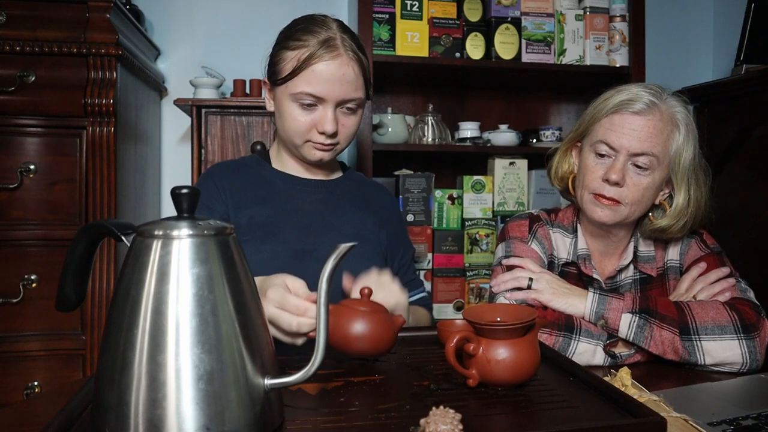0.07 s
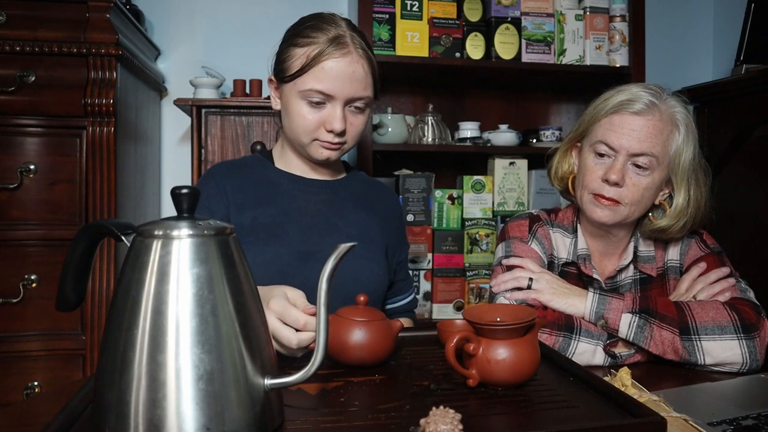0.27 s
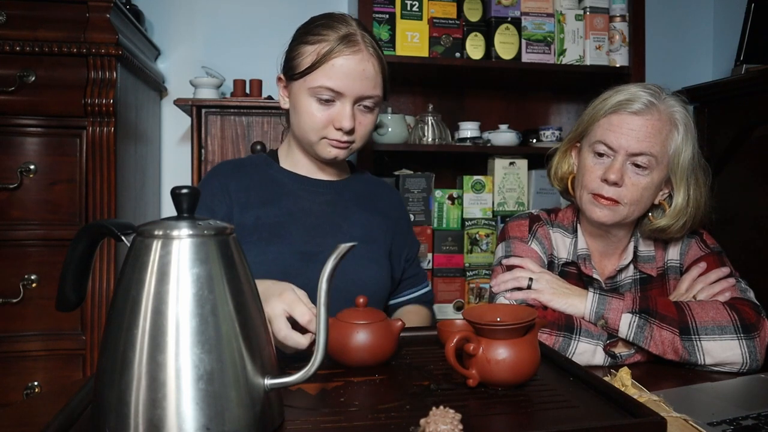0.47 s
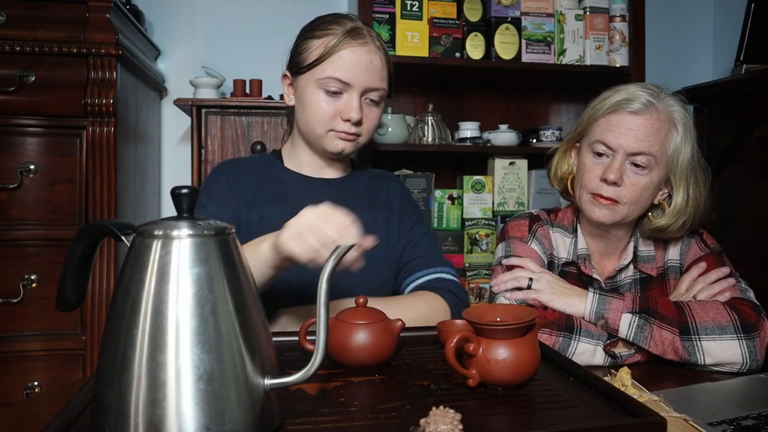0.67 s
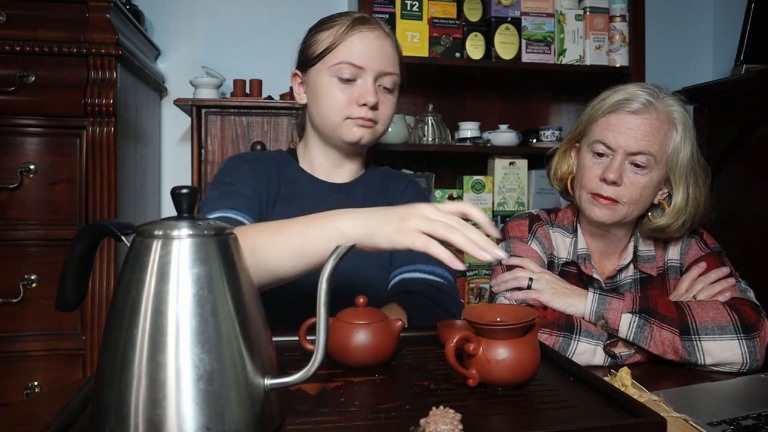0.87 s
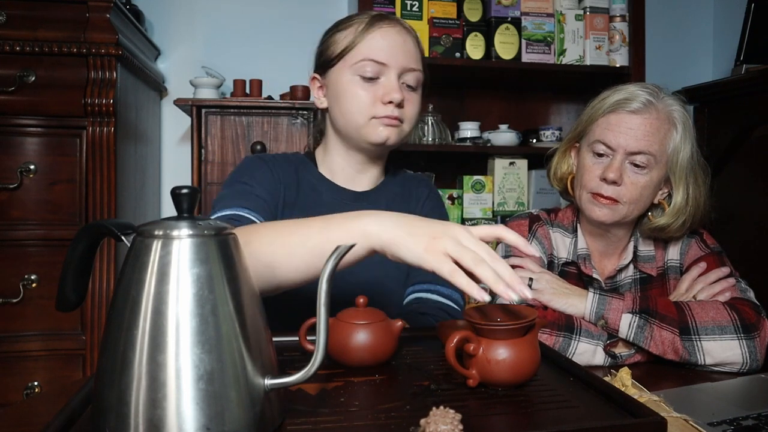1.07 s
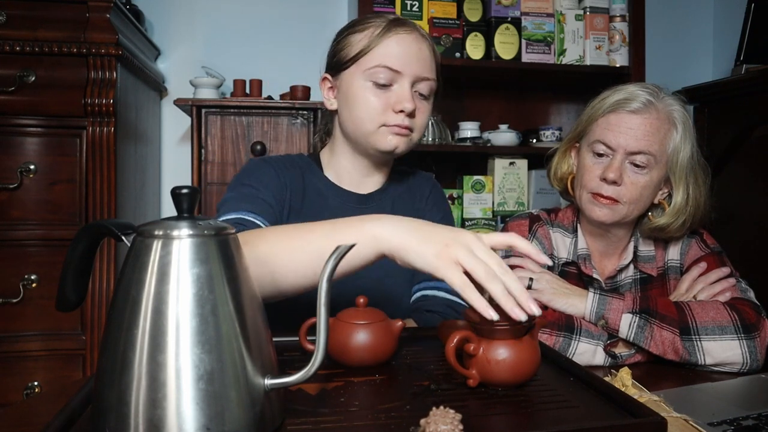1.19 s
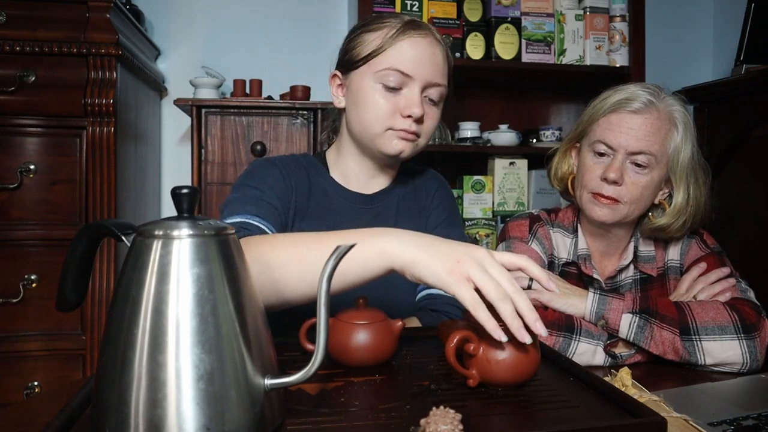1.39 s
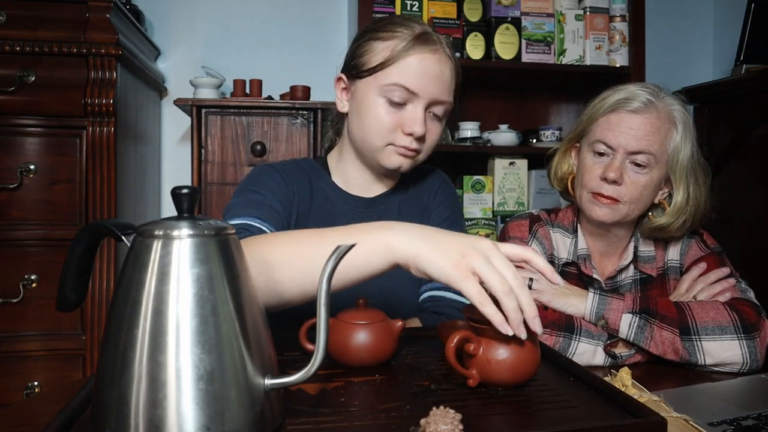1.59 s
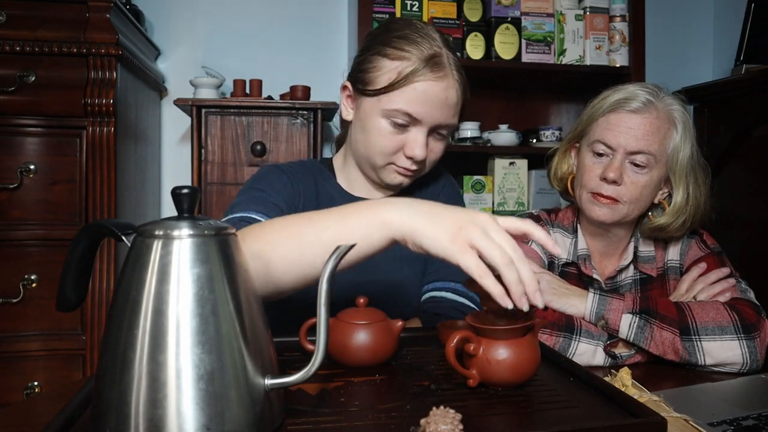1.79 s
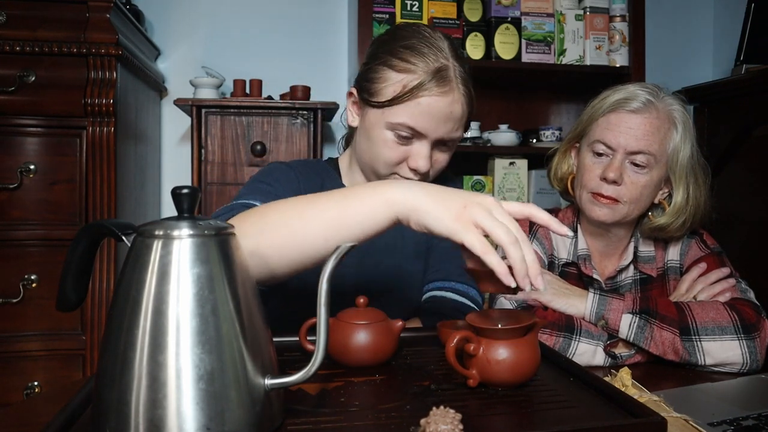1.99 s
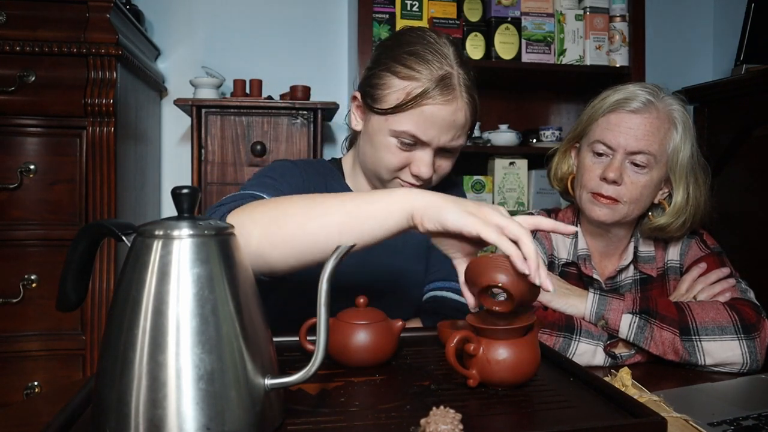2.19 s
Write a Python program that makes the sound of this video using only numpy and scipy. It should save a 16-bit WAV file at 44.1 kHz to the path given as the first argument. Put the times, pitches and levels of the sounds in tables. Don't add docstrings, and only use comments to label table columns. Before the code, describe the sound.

A small clay teapot hits a wooden tray at 0.2 s, very loud and sharp, its lid rattling brightly. It drags briefly and knocks again, less loudly, around 0.46 s. Near-quiet follows, with faint room tone. Sleeves rustle and the table thuds softly around 1.1-1.35 s. A clay strainer ticks onto a jug from 1.4 s, rubs faintly, clicks at 1.58 and 1.9 s, and settles with soft grinds. Close microphone, short room reverberation.

```python
import sys
import numpy as np
from scipy import signal
from scipy.fft import rfft, irfft, next_fast_len
from scipy.io import wavfile
from scipy.ndimage import map_coordinates

SR = 44100
rng = np.random.default_rng(int(sys.argv[2]) if len(sys.argv) > 2 else 0)


def inscribe(sig):
    pcm = np.round(np.clip(np.atleast_2d(sig).T, -1, 1) * 32767)
    wavfile.write(sys.argv[1], SR, pcm.astype(np.int16))


def boost_factor(decibels):
    exponent = np.asarray(decibels, float) / 20
    return 10 ** exponent


N = 99225
SPAN = 15876

# freq_hz, level_db
AIR_COLOUR = [(20, -14.5), (60, -10.5), (250, -10.5), (450, -14.5), (800, -27), (2500, -32), (8000, -42.5),
              (16000, -52)]
AIR_DB = -61.5
# freq_hz, t60_s
ROOM_T60 = [(100, 0.16), (600, .4), (3000, 0.27), (6000, 0.18), (12000, 0.083)]
# freq_hz, level_db
ROOM_COLOUR = [(100, -12), (1000, -0.5), (4500, 1), (12000, 3)]
WET_DB, RING_WET_DB, ROOM_GAP_S = -13.5, -20, .005
# freq_hz, level_db
MIC_TOP = [(14800, 0), (15500, -7), (15900, -22), (16500, -26)]

# time_s, level_db
SWAY = [(0, -66), (.19, -97), (.22, -41), (.45, -50), (.8, -59), (1.04, -69), (1.1, -53.5), (1.24, -35.5),
        (1.34, -49), (1.5, -42.5), (1.66, -57), (1.8, -54.5), (1.9, -67), (2.25, -74)]
SWAY_HZ, SWAY_WIDTH_HZ = 18.5, 7
# start_s, level_db, pitch_hz, t60_s
THUMPS = [(0.202, -31, 105, 0.15), (0.222, -22, 255.5, 0.17), (.205, -19, 427.8, .11),
          (0.301, -48, 84, 0.95), (.455, -36, 83.3, 0.35), (.58, -45, 83.4, 0.51), (1.066, -37, 61.7, 0.21),
          (1.088, -41.5, 110, 0.147), (1.112, -41.5, 309, 0.049), (1.19, -45.5, 116.8, 0.18),
          (1.2, -43, 252.5, 0.14), (.47, -28.5, 159.4, 0.1), (1.64, -50, 237.6, 0.31),
          (1.659, -52.5, 88.2, 0.39)]
# start_s, level_db, pitch_hz, t60_s
PINGS = [(0.2, -36.5, 5400, 0.49), (0.48, -54, 4274, 0.54), (1.6, -61.5, 4900, 0.17),
         (1.3, -35, 390, 0.079), (2.075, -56, 550, .08), (1.584, -47, 4320, 0.037), (1.908, -46, 975, 0.07),
         (1.621, -47, 2930, 0.094), (1.49, -68, 1700, 0.16), (1.696, -54, 4060, 0.12),
         (1.782, -54, 3000, 0.16)]
# time_s, rustle_db
SLEEVE = [(0, -69), (.15, -59.5), (.6, -67), (.69, -61.5), (.8, -77), (1.0, -63.5), (1.2, -51.5),
          (1.33, -55.5), (1.42, -70.5), (1.7, -67), (2.05, -71), (2.25, -66.5)]
# freq_hz, level_db
CLOTH = [(300, 4), (1200, -4), (2300, 0), (3300, -8.5), (4900, -6), (6200, -14), (15500, -26.5)]
GRIT_DB, FLUTTER_DB = 1.1, .9

# start_s, length_s, level_db, resonance_hz, top_hz
DRAGS = [
    (.35, 0.12, -41, 3100, 5900),
    (.40, 0.076, -39.5, 5190, 6900),
]
# start_s, length_s, level_db, resonance_hz, top_hz
SETTLING = [
    (1.08, 0.7, -50.5, 255, 674),
    (1.58, 0.46, -51, 307, 865),
    (1.485, 0.045, -81, 1900, 4970),
    (1.59, 0.25, -50.5, 830, 5640),
    (1.782, 0.117, -53, 2600, 8970),
    (1.9, 0.16, -45.5, 3330, 12100),
    (1.955, 0.085, -48.5, 1200, 5850),
]
SWELL_DB, FADE_DB = 14, 27.5
SLIDE_WIDTH_HZ, SLIDE_RISE, SLIDE_GRIT_DB, SLIDE_BROAD = 550, .15, 1.2, .28

# time_s, level_db
RUB = [(1.39, -95), (1.397, -69.5), (1.43, -74), (1.45, -84), (1.49, -82), (1.56, -91), (1.58, -68),
       (1.6, -87), (1.618, -65), (1.632, -48), (1.645, -72), (1.67, -78), (1.712, -76), (1.725, -92.5),
       (1.8, -120)]
# pitch_hz, width_hz, level_db
SINGING = [(4250, 120, -12), (8150, 600, -12), (8900, 260, 0), (9400, 240, -8), (14500, 200, -15)]
RUB_BODY_DB, RUB_GROWS, RUB_GRIT_DB = -3, 0.67, 3

# start_s, strength_db, rim_ring_db, colour_hz, contact_s
TOUCHES = [
    (1.453, -38, -52, 4470, 0.01),
    (1.461, -30, -56, 2217, 0.004),
    (1.466, -32, -49, 2980, 0.00597),
    (1.472, -32, -60, 1900, 0.0061),
    (1.479, -43.5, -60, 2000, .008),
]
# start_s, strength_db, rim_ring_db, colour_hz, contact_s
JUG_HITS = [(1.407, -57.5, -72, 4275, .006), (1.5835, -32.5, -63, 1900, 0.002),
            (1.619, -43.5, -70, 2780, .022), (1.586, -32, -61, 2600, 0.0014),
            (1.669, -47.5, -59, 2500, 0.007), (1.678, -50, -74, 5010, 0.0056),
            (1.688, -39, -60, 2186, 0.011), (1.703, -42.5, -68, 7000, 0.0064),
            (1.779, -39, -70, 900, 0.00404), (1.782, -40, -66, 11980, 0.004),
            (1.799, -48, -75.5, 2190, 0.0075), (1.816, -46, -78, 2448, 0.018),
            (1.8955, -30.5, -68, 4560, 0.0052), (1.8990, -25, -46, 8950, 0.00075),
            (1.949, -37.5, -68.5, 1802, 0.00975), (2.075, -55, -81, 500, 0.0082)]
# pitch_hz, width_hz, level_db
STRAINER = [(913, 62, -10), (1200, 110, -8), (1715, 96, -4), (1988, 99, 0.5), (2150, 90, -7.5),
            (2960, 80, -8.5), (4410, 80, -11), (4900, 150, -12.5)]
# pitch_hz, width_hz, level_db
JUG = [(525, 35, 6), (884, 33, 1.5), (1188, 48, 0), (1840, 84, -3), (1955, 48, -1.5), (2600, 70, -2),
       (2930, 69, 2.5), (4088, 115, 5), (4840, 38, -8.5)]
# pitch_hz, level_db, t60_s
RIM = [(8750, -3, .03), (8950, 0, .04), (9650, -6, .03), (14550, -12, .05)]
# freq_hz, level_db
JUG_COLOUR = [(300, -30), (600, 2), (4000, -6), (6500, -13.5), (16000, -25)]
# freq_hz, t60_s
JUG_T60 = [(500, 0.1), (3000, 0.04), (14000, 0.017)]
JUG_MODES_DB, STRAINER_MODES_DB = -1.5, 13

# start_s, strength_db, lid_ring_db, colour_hz, contact_s
POT_HITS = [(.2024, 3, -30, 2000, 0.0011), (.2076, 1, -13.5, 2564, 0.00062), (.2115, -8, -7, 4540, 0.0028),
            (.2150, -8.5, -14, 820, 0.0046), (.2180, -8, -16, 2500, .004), (.2220, -6.5, -12, 1900, 0.0019),
            (.2250, -11.5, -11, 600, 0.0048), (.2280, -10.5, -8.5, 5500, 0.007),
            (.2330, -15, -14, 4500, .002), (.2385, -23, -31, 2006, .003), (.6600, -58, -76.5, 5060, 0.029),
            (1.1720, -39, -72, 330, 0.0018), (1.1770, -37.5, -81, 2990, 0.00401),
            (1.3590, -45.5, -80, 1500, 0.0079)]
# start_s, strength_db, lid_ring_db, colour_hz, contact_s
KNOCKS = [
    (.4525, -20.5, -63, 600, 0.003),
    (.4558, -12.5, -35, 3500, .003),
    (.4595, -12, -50, 1000, 0.003),
    (.4660, -14, -37.5, 846, .004),
    (.4650, -26.5, -48, 4000, .007),
]
# pitch_hz, width_hz, level_db
TRAY = [(427, 24, 7), (755, 76, 8.5), (1070, 140, 7), (1400, 150, 9), (1570, 60, -5), (2077, 250, 2.5),
        (3100, 150, -4), (5180, 360, -4.5), (5820, 100, -6)]
# pitch_hz, width_hz, level_db
POT_BODY = [(523, 47, 2.5), (753, 49, -3), (850, 83, 0), (1406, 110, -3), (2370, 150, -18),
            (2770, 89, -3.5), (3200, 110, -15.5), (5195, 120, -17)]
# pitch_hz, level_db, t60_s
LOOSE_LID = [(4775, -20, .11), (5820, -15, .09), (6756, -19, .06), (8650, -4, .03), (8860, 0, .04),
             (9100, -20, .3), (9350, -23, .3), (9950, -24, .14), (10750, -18, .05), (12000, -25, .04),
             (13290, -28, .08), (14340, -21, .17), (14500, -12, .03)]
# pitch_hz, level_db, t60_s
SEATED_LID = [(8900, 0, .047), (9080, -14, .2), (9980, -20, .2), (10750, -16, .04), (14400, -14, .12)]
# freq_hz, level_db
TRAY_COLOUR = [(60, -7), (200, -15.5), (600, -4.5), (3000, -2), (6000, -1), (12000, -21), (16000, -33.5)]
# freq_hz, t60_s
TRAY_T60 = [(150, 0.39), (1000, 0.045), (5000, 0.011), (14000, 0.0084)]
TRAY_MODES_DB, KNOCK_MODES_DB = -12, -10

GRIT_S = .002
BLUR_HZ = 55.6
MODE_SCATTER_DB = -3
COLOUR_WIDTH, COLOUR_STEEP = 1.5, 1.15


def unit(x):
    return x / np.sqrt(np.mean(x ** 2) + 1e-20)


def along(points, hz):
    f, v = np.transpose(points)
    return np.interp(np.log(hz + 1), np.log(f + 1), v)


def curve(rows):
    return np.interp(np.arange(N) / SR, *np.transpose(rows))


def wobble(rate):
    knots = rng.standard_normal(int(N * rate / SR) + 4)
    return map_coordinates(knots, [np.arange(N) * rate / SR])


def filtered(x, response):
    m = next_fast_len(len(x) + SR // 8)
    return irfft(rfft(x, m) * response(np.fft.rfftfreq(m, 1 / SR)), m)[:len(x)]


def peak(f, hz, width_hz):
    return 1j * f * width_hz / (hz * hz - f * f + 1j * f * width_hz)


def add(out, s, x):
    part = out[max(round(s * SR), 0):][:len(x)]
    part += x[:len(part)]


def dying(t60s, colour):
    hz, t, z = signal.stft(rng.standard_normal(SPAN + 128), SR, nperseg=128)
    decay_db = 60 * t / along(t60s, hz)[:, None]
    gain = boost_factor(along(colour, hz)[:, None] - decay_db)
    tail = signal.istft(z * gain, SR, nperseg=128)[1][64:SPAN + 64]
    return tail / np.linalg.norm(tail)


def ringing(modes):
    t = np.arange(SPAN) / SR
    steps = rng.standard_normal((len(modes), SPAN))
    wander = np.cumsum(steps, axis=1) * np.sqrt(2 * np.pi * BLUR_HZ / SR)
    out = np.zeros(SPAN)
    for (hz, db, t60), phase in zip(modes, wander):
        level_db = db + MODE_SCATTER_DB * rng.normal() - 60 * t / t60
        out += boost_factor(level_db) * np.sin(2 * np.pi * hz * t + phase)
    return out


def room(x, wet_db):
    tail = np.pad(dying(ROOM_T60, ROOM_COLOUR), (round(ROOM_GAP_S * SR), 0))
    return x + boost_factor(wet_db) * signal.fftconvolve(x, tail)[:len(x)]


def air():
    level = boost_factor(AIR_DB + 1.2 * wobble(6))
    return level * unit(filtered(rng.standard_normal(N), lambda f: boost_factor(along(AIR_COLOUR, f))))


def table():
    sway = unit(filtered(rng.standard_normal(N), lambda f: peak(f, SWAY_HZ, SWAY_WIDTH_HZ) ** 2))
    out = boost_factor(curve(SWAY)) * sway
    t = np.arange(2 * SPAN) / SR
    onset = 1 - np.exp(-t / 0.001)
    for s, db, hz, t60 in THUMPS + PINGS:
        add(out, s, boost_factor(db - 60 * t / t60) * np.sin(2 * np.pi * hz * t) * onset)
    return out


def sleeves():
    grit = rng.standard_normal(N) * boost_factor(GRIT_DB * wobble(300) + FLUTTER_DB * wobble(25))
    rustle = unit(filtered(grit, lambda f: boost_factor(along(CLOTH, f)) * (f > 300)))
    return boost_factor(curve(SLEEVE) - 5.0) * rustle


def slides(rows, change_db):
    out, t = np.zeros(N), np.arange(N) / SR
    for s, length, db, hz, top_hz in rows:
        def tone(f):
            body = peak(f, hz, SLIDE_WIDTH_HZ) + SLIDE_BROAD * peak(f, 2250, 9400)
            return body / (1 + (f / top_hz) ** 4)
        grit = rng.standard_normal(N) * boost_factor(SLIDE_GRIT_DB * wobble(200))
        u = (t - s) / length
        level_db = db + change_db * (u.clip(0, 1) - (change_db > 0))
        stroke = np.interp(u, [0, SLIDE_RISE, .8, 1], [0, 1, 1, 0])
        out += boost_factor(level_db) * stroke * unit(filtered(grit, tone))
    return out


def resonances(rows, f):
    return sum((-1) ** k * boost_factor(db) * peak(f, hz, width) ** 2 for k, (hz, width, db) in enumerate(rows))


def rubbing():
    db = curve(RUB)
    grit = rng.standard_normal((2, N)) * boost_factor(RUB_GRIT_DB * wobble(250))
    rim = filtered(boost_factor(db) * grit[0], lambda f: resonances(SINGING, f)) * 8.0
    body_db = db.max() + RUB_GROWS * (db - db.max()) + RUB_BODY_DB
    body = filtered(boost_factor(body_db) * grit[1], lambda f: resonances(JUG, f) + .4 * peak(f, 2500, 4000)) * 2.5
    return rim + room(body, WET_DB)


def contacts(hits, peaks, modes_db, colour, t60s, bright):
    out, rings, t = np.zeros(N), np.zeros(N), np.arange(SPAN) / SR
    modes = [(hz, db, np.log(1000) / np.pi / width) for hz, width, db in peaks]
    for s, db, ring_db, mid_hz, length in hits:
        press = np.sin(np.pi * np.clip(t / length, 0, 1) ** .8) ** 2
        grit = np.sign(rng.standard_normal(SPAN)) * press
        blow = t == t[round(length * SR / 4)]
        force = grit / np.linalg.norm(grit) * length / GRIT_S + blow
        tones = ringing(modes)
        body = dying(t60s, colour) + boost_factor(modes_db) * tones / np.linalg.norm(tones)
        body = signal.fftconvolve(force, body)[:SPAN]
        body = filtered(body, lambda f: peak(f, mid_hz, COLOUR_WIDTH * mid_hz) ** COLOUR_STEEP)
        ring = signal.fftconvolve(force, ringing(bright))[:SPAN]
        add(out, s, room(boost_factor(db) * body / np.abs(body).max(), WET_DB))
        add(rings, s, boost_factor(ring_db) * ring / np.abs(ring).max())
    return out + room(rings, RING_WET_DB)


def strainer_on_jug():
    ticks = contacts(JUG_HITS, JUG, JUG_MODES_DB, JUG_COLOUR, JUG_T60, RIM)
    return ticks + contacts(TOUCHES, STRAINER, STRAINER_MODES_DB, JUG_COLOUR, JUG_T60, RIM)


def teapot_on_tray():
    landing = contacts(POT_HITS, TRAY, TRAY_MODES_DB, TRAY_COLOUR, TRAY_T60, LOOSE_LID)
    return landing + contacts(KNOCKS, POT_BODY, KNOCK_MODES_DB, TRAY_COLOUR, TRAY_T60, SEATED_LID)


def scene():
    clay = teapot_on_tray() + rubbing() + strainer_on_jug()
    friction = slides(DRAGS, SWELL_DB) + slides(SETTLING, -FADE_DB)
    background = sleeves() + table() + air()
    return (clay + friction + background)[None]


def roll_off(x):
    return signal.sosfilt(signal.butter(12, 16390, fs=SR, output="sos"), x)


def record(dry):
    x = filtered(np.clip(dry[0], -1, 1), lambda f: boost_factor(along(MIC_TOP, f)))
    mix = np.clip(x, -1, 1)[None]
    return roll_off(mix)


dry = scene()
out = record(dry)
inscribe(out)
```